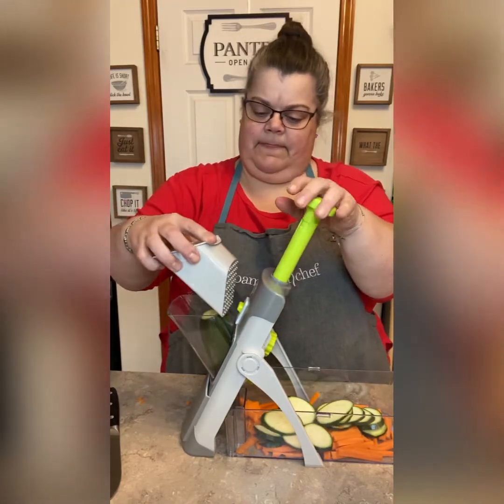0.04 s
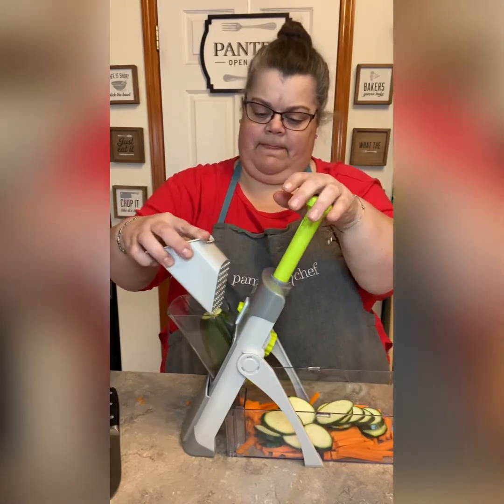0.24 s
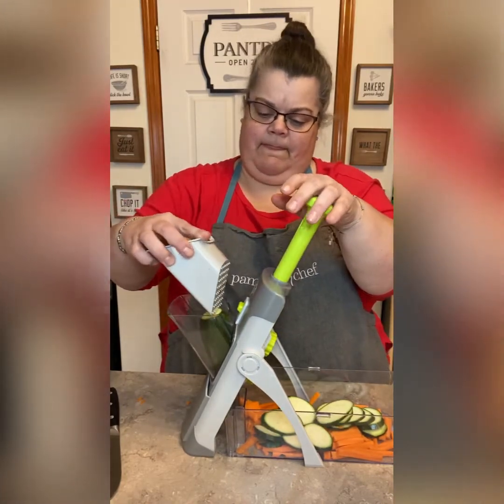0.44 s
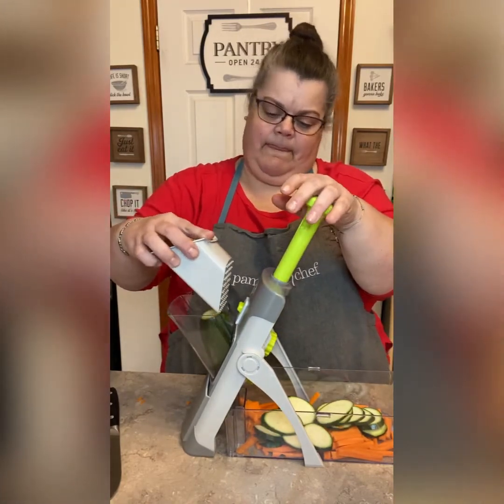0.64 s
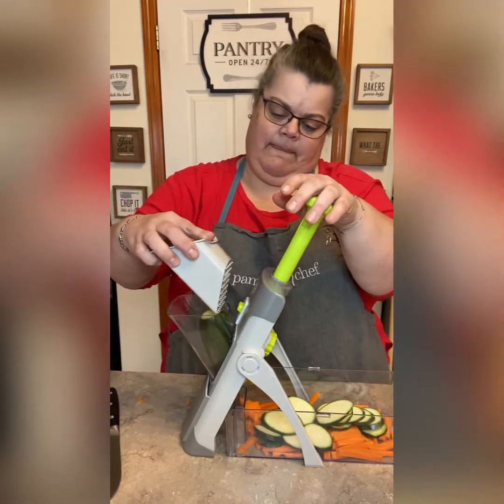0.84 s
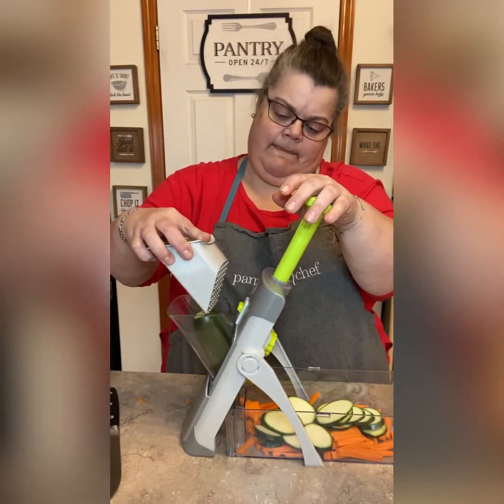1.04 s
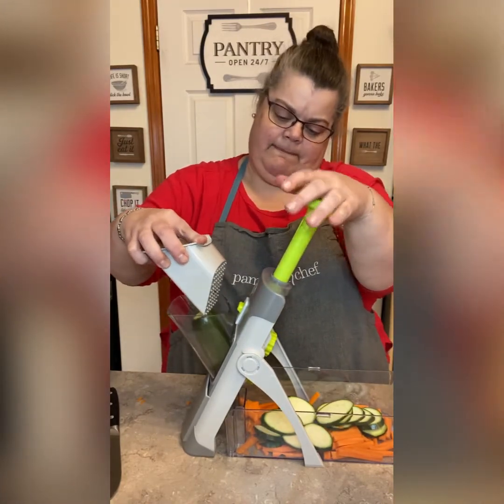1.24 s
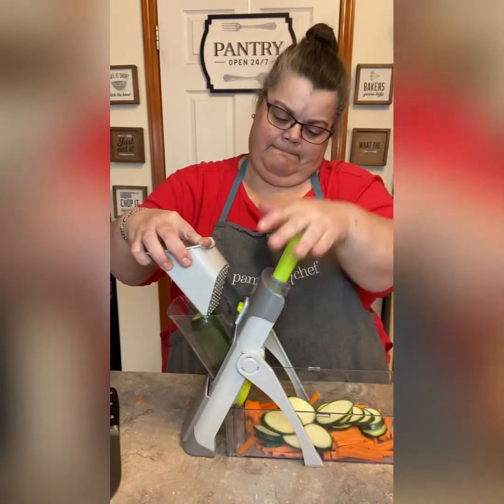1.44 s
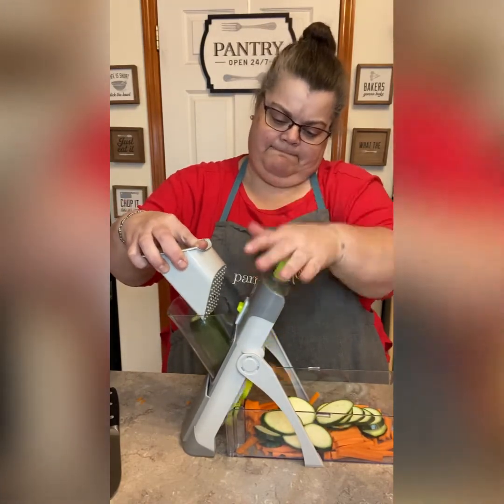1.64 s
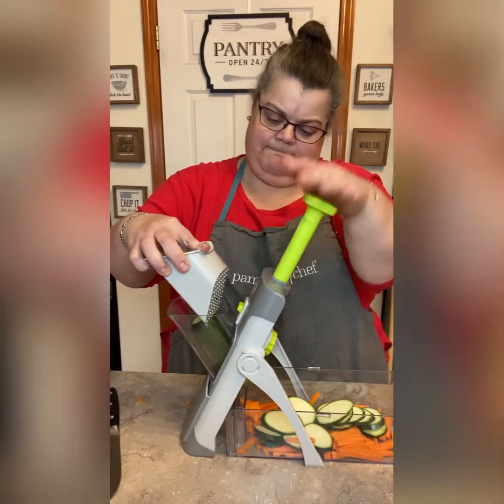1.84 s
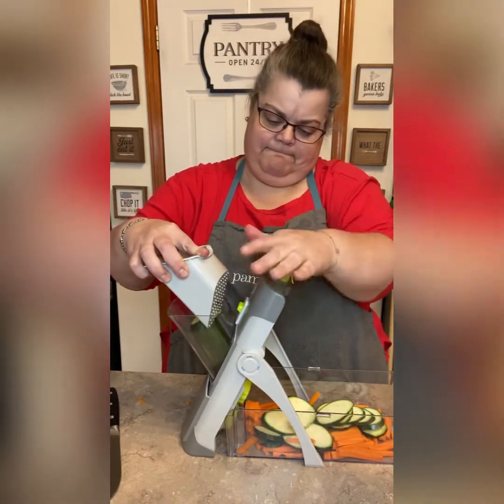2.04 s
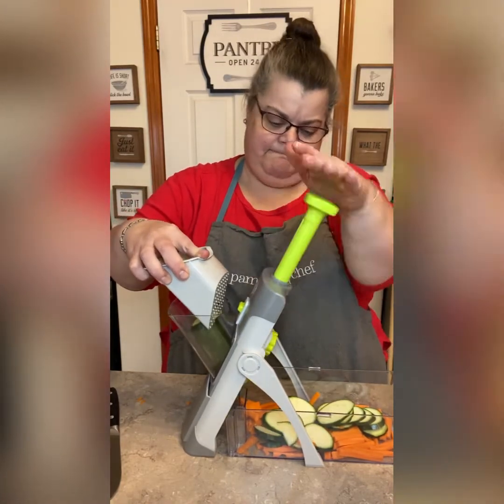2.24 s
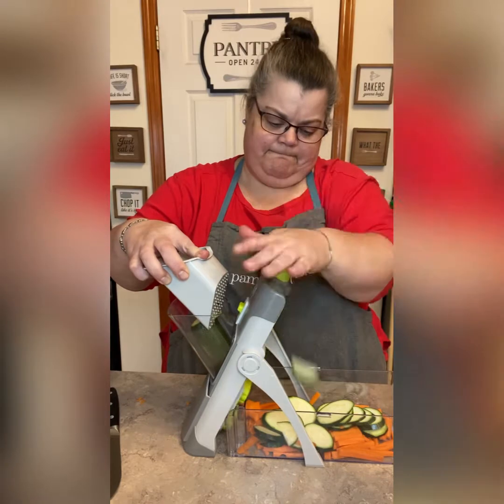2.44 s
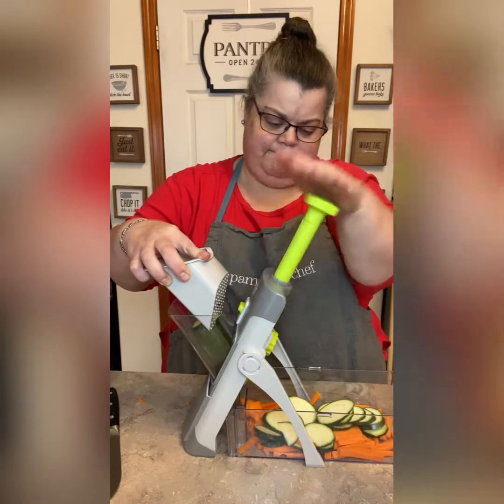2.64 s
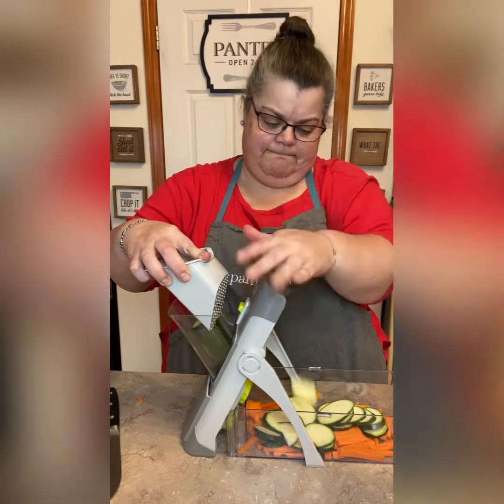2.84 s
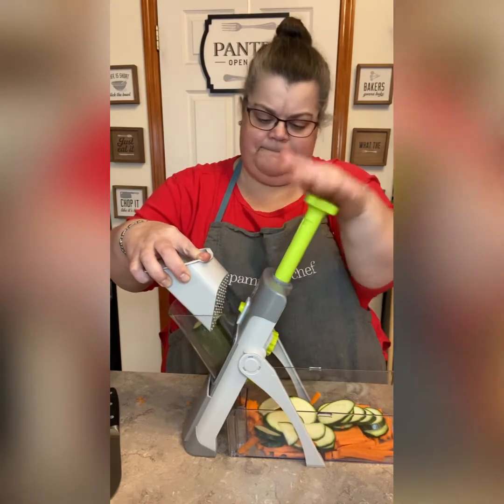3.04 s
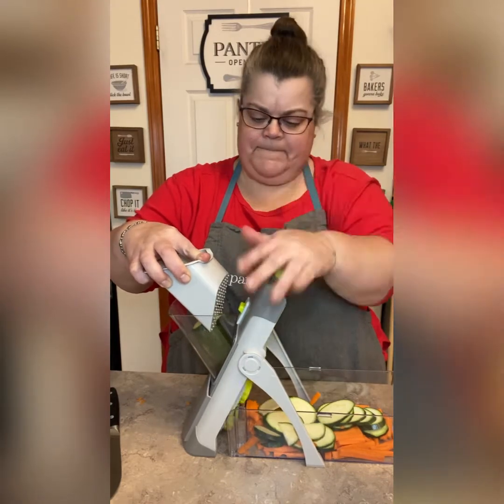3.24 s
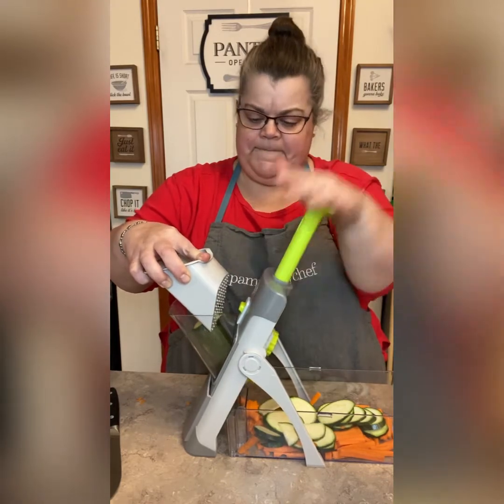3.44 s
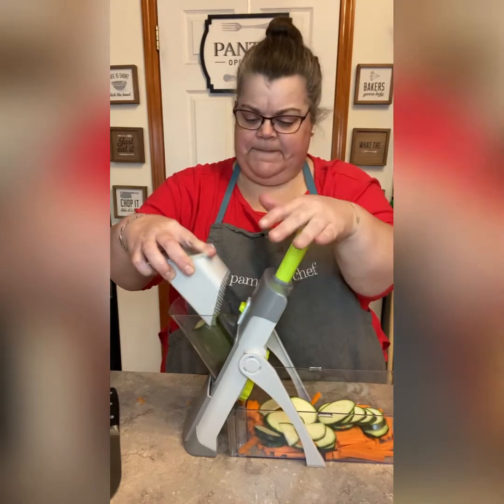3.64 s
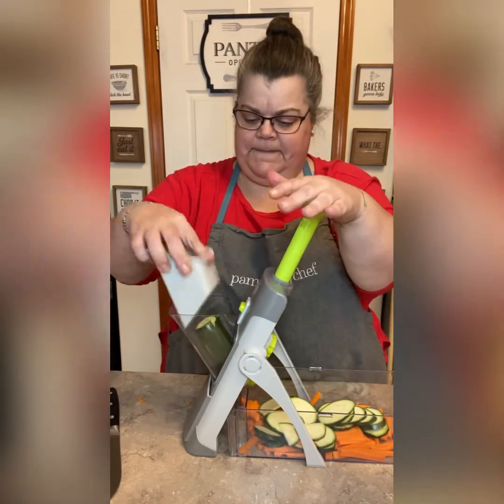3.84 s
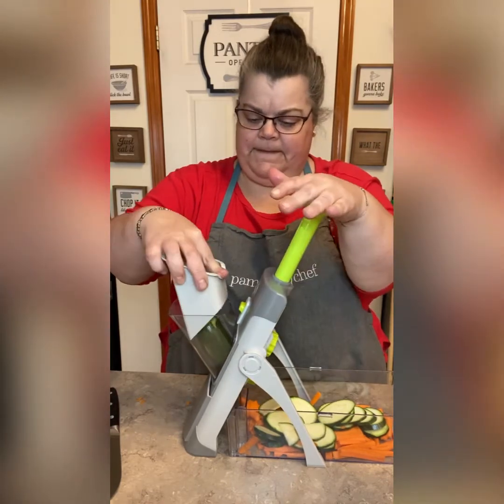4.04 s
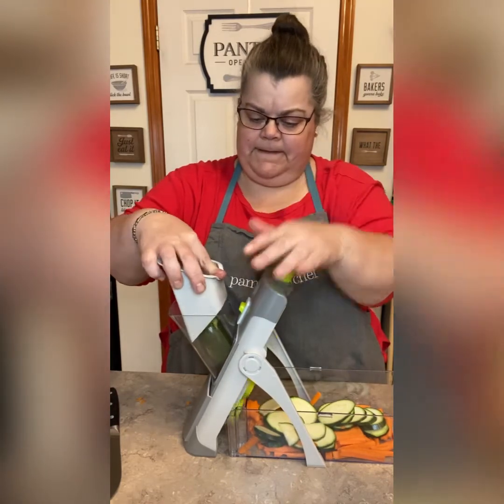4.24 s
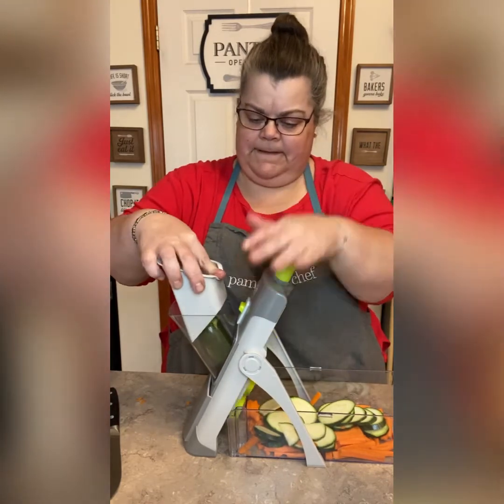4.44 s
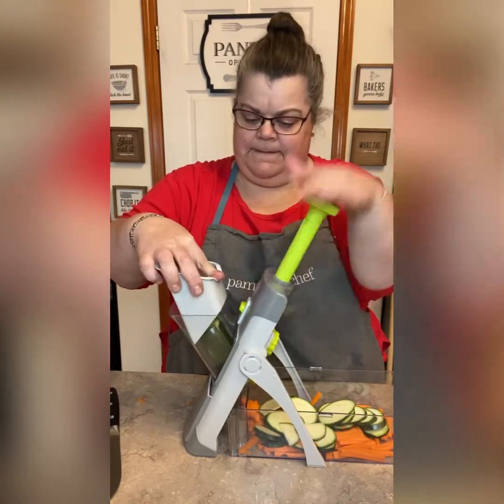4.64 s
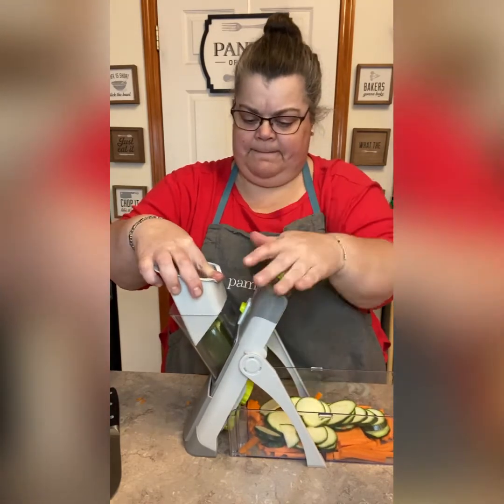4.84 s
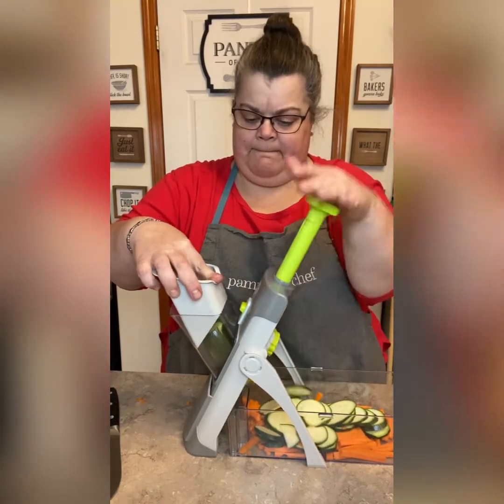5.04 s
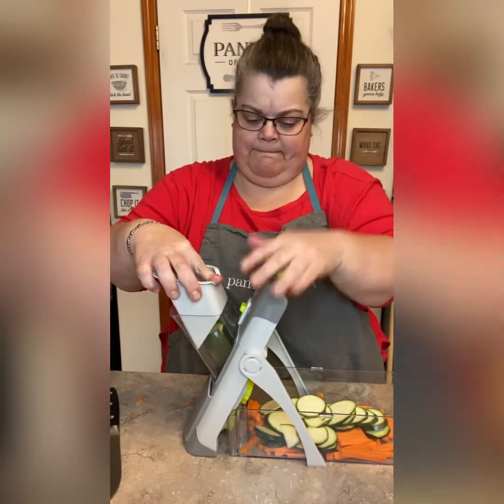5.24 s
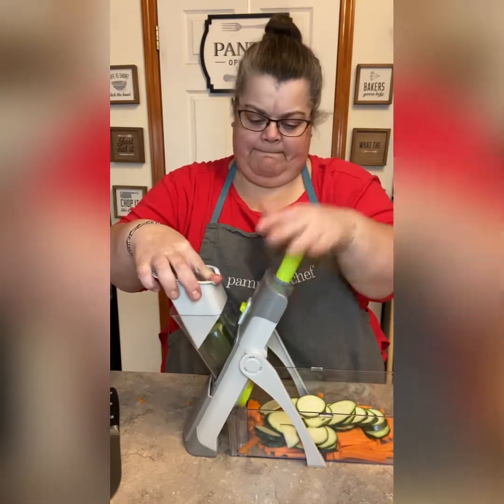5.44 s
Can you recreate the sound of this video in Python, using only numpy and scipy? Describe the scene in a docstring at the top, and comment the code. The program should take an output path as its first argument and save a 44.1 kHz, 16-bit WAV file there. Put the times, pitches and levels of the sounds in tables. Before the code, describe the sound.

A spring-loaded plastic vegetable slicer is heard up close on a stone counter in a small kitchen. For the first second or so there are only soft ticks and nudges as hands touch the plastic. From about 1.3 to 3.5 seconds the plunger is pumped five times, a little over two strokes a second. On each push the blade hisses and crunches through the vegetable and lands with a low thud through the counter; the spring then throws it back with a sharp clack that briefly rings the hollow housing, with light rubbing and rattling. A short pause holds a few taps, the clearest near 3.8 seconds. From about 4.1 seconds three more strokes follow, the strongest knock near 4.7 seconds, and the last is let back gently around 5.4 seconds. A short room echo and a faint, steady low appliance hum lie underneath throughout.

```python
"""A spring-loaded plastic slicer on a stone counter in a small kitchen, heard from close by.
First, hands nudge and tick the frame. From 1.3 s the plunger is pumped five times: the blade hisses and
crunches through the food, lands with a thud that travels through the counter, and the spring clacks it
back against its stop, ringing the hollow housing. A few taps follow, then from 4.1 s three more strokes,
the last let back gently. A short room tail and a faint hum of appliances lie under it all."""
import sys
import numpy as np
from scipy import signal
from scipy.fft import rfft, irfft, next_fast_len
from scipy.io import wavfile
from scipy.ndimage import uniform_filter1d

SR = 44100
rng = np.random.default_rng(int(sys.argv[2]) if len(sys.argv) > 2 else 0)


def materialize(psi):
    """Save the field psi as 16-bit PCM at rate SR to the path in sys.argv[1].

    A 1-D psi becomes a single channel; in a 2-D psi each row is a channel.
    """
    bounded = np.clip(np.atleast_2d(psi).T, -1, 1)
    quanta = np.round(bounded * 32767).astype(np.int16)
    wavfile.write(sys.argv[1], SR, quanta)


N = 242991

# Modes of the plastic frame: pitch_hz, level_db, t60_s
FRAME_MODES = [(250, 6, 0.024), (330, 10, 0.045), (382, 1.5, 0.054), (470, -10, 0.013), (495, 6, 0.018),
               (620, -17.5, 0.03), (700, -13, 0.044), (739.5, 1, 0.065), (784, -10.5, 0.15),
               (830, -13, 0.046), (990, 0, 0.009), (1000, -8, 0.073), (1070, 4, 0.027),
               (1206, -10.5, 0.039), (1283, 2.5, 0.0096), (1612, 18.5, 0.01), (2080, -12.5, 0.0084),
               (2110, 0, 0.065), (2300, 5.5, 0.023), (2550, 12.5, 0.012), (2905, -2.5, 0.076),
               (3130, -5, 0.018), (3440, -10, 0.0058), (3940, -22.5, 0.0021)]
# Bright colour of cracks and blade hiss: frequency_hz, level_db
CRACK_COLOUR = [(2500, -18.5), (3600, -2), (4500, 4), (5500, -3), (7000, -6), (9000, -5.5), (11000, -9),
                (13000, -3), (15500, -29), (16500, -44)]
# Darker colour of the rubbing rails: frequency_hz, level_db
RUB_COLOUR = [(200, -8.5), (350, -17.5), (520, -3.5), (750, -2.5), (1100, -2.5), (1600, -6.5), (2400, -6.5),
              (3200, -16.5), (4200, -29), (6000, -19), (9000, -39.5)]
# The plunger bottoms out: start_s, thud_db, clack_over_thud_db, hollow_hz, rattle_s
LANDINGS = [(1.493, -6, -3, 873, 0.009), (1.972, -5.5, -1.5, 805, 0.0094), (2.3779, -5.5, -7.5, 885, 0.014),
            (2.792, -5, 0.3, 815, 0.0085), (3.2008, -3, -1, 894, 0.0055), (4.255, -11, -6.5, 887, 0.014),
            (4.7462, -5.5, -7, 900, 0.01), (5.226, -7.5, -6, 800, 0.0087)]
# The spring throws it against its stop: start_s, clack_db, clack_hz, hollow_db, hollow_hz, crack_db, thud_db
RETURNS = [(1.7261, -3, 2110, -6.5, 790, -12, -24), (2.177, -2, 2320, -7.5, 787, -9.5, -20.5),
           (2.608, -1, 2480, -3.5, 838, -8, -17.5), (3.0116, -3, 2550, -6.5, 880, -10, -19),
           (3.4278, -2.5, 2530, -6, 880, -8.5, -20.5), (4.5124, -5, 2550, -5.5, 849, -12, -15.5),
           (5.0135, -10, 1970, -10.5, 830, -17, -17.5), (5.447, -21, 2360, -27.5, 915, -33, -27.5)]
# Short scrapes that chatter on: start_s, hollow_db, clack_db, loose_chatter_db
SCRAPES = [(0.126, -45, -56, 12), (.63, -36.5, -49.5, 2), (.899, -49, -74, 9), (1.664, -35, -26, -4),
           (2.1399, -37, -25, -21), (2.347, -41, -25, 0), (2.572, -48, -31.5, -12), (2.766, -33, -25.5, 12),
           (2.975, -37.5, -28, -18.5), (3.171, -41, -29.5, -2), (3.3914, -51, -38.5, -5),
           (4.922, -27, -33.5, -8)]

HAZE_S = 0.0098  # a faint haze of noise starts this long before each blow
HOLLOW_HZ, CLACK_HZ = 950, 2527  # home pitches of the housing and the struck panel
CHATTER_TOP_HZ = 13100  # loose parts and the sliding blade carry little above this
KNOCK_SAMPLES = 8192
KNOCK_BINS_HZ = np.fft.rfftfreq(KNOCK_SAMPLES, 1 / SR)


def blows():
    """Cue list of every landing, return, click, scrape and tap, with the balance of its layers."""
    # Thin bright clicks, mostly in mid-stroke: start_s, crack_db, crack_hz, rattle_s
    clicks = [(0.684, -48.5, 6960, 0.0039), (1.239, -62.5, 5030, 0.0076), (1.253, -66, 5000, 0.011),
              (1.842, -30, 5560, 0.0049), (1.905, -36, 5500, 0.0044), (2.279, -30.5, 6640, 0.0028),
              (3.319, -43, 6000, 0.0067), (4.6354, -22, 4800, 0.0033), (4.689, -46, 4540, 0.0027),
              (5.098, -34.5, 7000, 0.0042), (5.108, -53, 6500, 0.0024), (5.399, -52, 4960, .003)]
    # Hands, slices and loose parts tap the frame:
    # start_s, hollow_db, hollow_hz, clack_db, thud_db, rattle_s, loose_chatter_db
    taps = [(0.1418, -29, 950, -41, -66, 0.009, -21), (0.207, -40.5, 684, -58, -46, 0.0029, 1),
            (0.311, -37.5, 604, -76, -54, 0.0031, -33), (0.427, -46, 795, -77, -60, 0.011, -15),
            (0.528, -28, 620, -51, -42, 0.0039, -12), (0.682, -38, 666, -47, -45, 0.013, -10),
            (0.835, -38.5, 605, -58, -45, 0.0098, -7), (0.858, -35.5, 720, -48, -48, 0.005, -11),
            (0.951, -46.5, 740, -63, -65, 0.012, -3), (1.0275, -43, 1100, -78, -73, 0.0041, -32),
            (1.1085, -42, 1070, -59, -65, 0.012, -15), (1.36, -41.5, 720, -44, -43, 0.0065, -9),
            (1.379, -66, 700, -64, -47, 0.0056, -21), (1.414, -41, 750, -50, -51, .005, -18),
            (1.447, -35, 1070, -28, -49, 0.005, -2), (1.608, -27.5, 1210, -39, -27.5, 0.01, -4.5),
            (1.68, -33.5, 850, -35.5, -53, 0.0056, -7), (1.695, -56, 840, -39, -53, .006, -19),
            (1.735, -15, 763, -18, -55, 0.0057, -19), (1.88, -29.5, 710, -46, -32, 0.005, 5),
            (1.893, -20, 1250, -25.5, -25.5, 0.0053, -10), (1.938, -37, 660, -31, -36, 0.0042, -12),
            (2.0593, -29, 584, -32, -26, 0.0058, -27), (2.11, -47, 760, -41, -46, 0.0035, -9),
            (2.191, -37, 760, -25, -49, 0.0044, 0), (2.4891, -42, 670, -41, -31, 0.0064, -6),
            (2.531, -45, 750, -43, -53, 0.0034, -3), (2.902, -29, 706, -31.5, -31, 0.0047, -3),
            (3.315, -26, 736, -47, -29.5, 0.007, -16), (3.357, -48, 756, -40, -53, .004, -12),
            (3.533, -32, 736, -41, -45, 0.0031, -11.5), (3.642, -33, 1360, -48, -50, 0.0045, -16),
            (3.784, -35, 1000, -29.5, -53.5, 0.0028, -20.5), (3.8382, -21, 688, -26.5, -41, 0.0081, -11.5),
            (3.931, -40.5, 710, -50.5, -68.5, 0.0051, -4.5), (4.152, -48, 800, -47, -58, .004, -3),
            (4.172, -43, 890, -41, -49, 0.0065, 0), (4.205, -42, 716, -47, -48, 0.0098, -13),
            (4.39, -29, 714, -36.5, -30.5, 0.019, -28), (4.425, -36, 720, -40.5, -37.5, 0.0053, 15),
            (4.474, -17.5, 860, -19.5, -20.5, 0.0064, -2.5), (4.7061, -8.5, 830, -15, -12.5, 0.0064, -4.5),
            (4.889, -31.5, 790, -41, -29, 0.012, -18), (4.974, -23.5, 1440, -19, -26, 0.0088, -18),
            (4.9825, -22.5, 650, -17.5, -24.5, 0.0024, -14.5), (5.106, -31.5, 725, -26.5, -38, 0.0029, -23),
            (5.186, -21.5, 665, -25, -31, 0.0088, -8.5), (5.363, -37, 710, -59, -30.5, 0.0042, -17),
            (5.414, -38, 750, -35.5, -48, 0.0034, 1), (5.4554, -21.5, 776, -21.5, -25, 0.0065, -7.5)]
    crack_hz = 6000
    # Each row: start_s, clack_db, clack_hz, thud_db, shell_db, hollow_db, hollow_hz,
    # crack_db, crack_hz, rattle_s, loose_chatter_db
    rows = [(s, thud + hard, 1857, thud, thud + hard + 0.63, thud + hard / 2 - 1.5, hollow_hz,
             thud + hard - 9, crack_hz, rattle_s, -12) for s, thud, hard, hollow_hz, rattle_s in LANDINGS]
    rows += [(s, clack, clack_hz, thud, thud - 1, hollow, hollow_hz, crack, crack_hz, 0.0064, -17.5)
             for s, clack, clack_hz, hollow, hollow_hz, crack, thud in RETURNS]
    rows += [(s, crack - 19.5, CLACK_HZ, crack - 14.5, crack - 14.5, crack - 18, HOLLOW_HZ,
              crack, hz, rattle_s, -29) for s, crack, hz, rattle_s in clicks]
    rows += [(s, clack, CLACK_HZ, hollow - 9.5, hollow - 9.5, hollow, 800,
              clack - 14, crack_hz, 0.008, loose) for s, hollow, clack, loose in SCRAPES]
    rows += [(s, clack, CLACK_HZ, thud, thud - 1.5, hollow, hz, clack - 10.5, crack_hz, rattle_s, loose)
             for s, hollow, hz, clack, thud, rattle_s, loose in taps]
    return rows


def knocks():
    """Each blow rings the frame in three layers (low shell, hollow, clack) with a bright crack on top."""
    scrape_times = [row[0] for row in SCRAPES]
    stop_times = [row[0] for row in LANDINGS + RETURNS]
    dull = 1 / np.sqrt(1 + (KNOCK_BINS_HZ / CHATTER_TOP_HZ) ** 16)
    out = np.zeros(N + 2 * KNOCK_SAMPLES)
    for (s, clack_db, clack_hz, _, shell_db, hollow_db, hollow_hz,
         crack_db, crack_hz, rattle_s, loose_db) in blows():
        modes = struck_modes(hollow_hz, clack_hz)
        # scrapes and gentle touches have no hard attack
        hardness = (s not in scrape_times) * np.clip((hollow_db + 35) / 6, 0, 1)
        haze_db = -28 if s in stop_times else -43  # stronger before the plunger's stops
        haze, attack, rattle, loose = contacts(haze_db, hardness, rattle_s, loose_db)
        rings = frame_ring(modes, haze, attack + rattle, loose)
        crack_eq_db = along(CRACK_COLOUR, KNOCK_BINS_HZ) - 3.5 * octaves(KNOCK_BINS_HZ + 1, crack_hz)
        crack = (rattle + .3 * attack + dull * (loose + .3 * haze)) * undb(crack_eq_db)
        layers = irfft([*rings, crack], KNOCK_SAMPLES)[:, :-1024]
        levels_db = (shell_db + 2, hollow_db + 1.5, clack_db + 0.5, crack_db + 7.5)
        i = int((s - HAZE_S - .0011) * SR)
        out[i:i + layers.shape[1]] += sum(peak(layer, db) for layer, db in zip(layers, levels_db))
    return out[:N]


def contacts(haze_db, hardness, rattle_s, loose_db):
    """Spectra of one blow: a faint haze of noise just before it, a hard push, a rattle, loose chatter."""
    t = np.arange(5120) / SR
    after = np.maximum(t - HAZE_S, 0)
    haze = undb(haze_db) * (1 - np.exp(-t / 0.00092)) * (t < HAZE_S + .002)
    attack = hardness * undb(11) * np.exp(-((t - HAZE_S - .0008) / 0.00013) ** 2)
    rise = 1 - np.exp(-(after / max(0.26 * rattle_s, .0002)) ** 2)
    rattle = rise * np.exp(-(after / max(rattle_s, .0005)) ** 2.56)
    loose = undb(loose_db) * (1 - np.exp(-after / 0.0013)) * np.exp(-after / 0.031)
    grit = rng.standard_normal(len(t)) * undb(3.8 * rng.standard_normal(len(t)))
    return rfft([grit * haze, attack, grit * rattle, grit * loose], KNOCK_SAMPLES)


def struck_modes(hollow_hz, clack_hz):
    """Every blow lands elsewhere: modes near its hollow and clack pitches ring most, the rest by chance."""
    cavity, panel = (HOLLOW_HZ, -4.5, 0.053), (CLACK_HZ, -2.5, 0.023)  # pitch_hz, level_db, t60_s
    hz, db, t60 = np.transpose(FRAME_MODES + [cavity, panel])[:, :, None]
    region = np.searchsorted([500, 1500], hz)  # 0 shell, 1 hollow, 2 clack
    spot_db = -27 * octaves(hz, hollow_hz) * (region == 1) - 14 * octaves(hz, clack_hz) * (region == 2)
    spot_db += 1.6 * rng.standard_normal(hz.shape)
    pitch = hz * (1 + 0.016 * rng.standard_normal(hz.shape))
    pitch[-2:, 0], spot_db[-2:] = (hollow_hz, clack_hz), 0  # cavity and panel take the blow's own pitches
    return pitch, db + spot_db, t60, region


def frame_ring(modes, haze, hit, loose):
    """Spectra of the frame's three regions, each in its own band; slow bending waves bring the lows late."""
    # Shell, hollow and clack regions: low_hz, high_hz, delay_s, haze_gain
    regions = [(215, 770, 0.00341, .1), (462, 2200, 0.00202, 0.66), (1210, 7200, 0.00019, 2.3)]
    pitch, db, t60, region = modes
    t = np.arange(1536) / SR
    swing = undb(db) * np.sin(2 * np.pi * pitch * t)
    drive = np.interp(pitch, KNOCK_BINS_HZ, np.abs(hit))
    evening = (np.mean(drive) / (drive + 0.52 * np.mean(drive))) ** 0.91  # the rattle misses no mode
    free = swing * evening * 1000. ** (-t / t60)
    damped = swing * 1000. ** (-t / (0.2 * t60))  # chatter damps the modes
    rings = []
    for k, (low_hz, high_hz, delay_s, haze_gain) in enumerate(regions):
        inside = region[:, 0] == k
        struck = (hit + haze_gain * haze) * rfft(free[inside].sum(axis=0), KNOCK_SAMPLES)
        chatter = 2.55 * loose * rfft(damped[inside].sum(axis=0), KNOCK_SAMPLES)
        _, band = signal.freqz(*signal.butter(3, [low_hz, high_hz], "band", fs=SR), KNOCK_BINS_HZ, fs=SR)
        rings.append((struck + chatter) * band * np.exp(-2j * np.pi * KNOCK_BINS_HZ * delay_s))
    return rings


def counter_thuds():
    """Each blow sends a bending wave through the counter: highs arrive first, a few slow swings follow."""
    counter_hz, legs_s, rock_s = 105.5, 0.0028, .005
    t = np.arange(5120) / SR
    cycles = counter_hz * t + 0.66 * (1 - np.exp(-(t / 0.0057) ** 2.36))
    rise = 1 - np.exp(-(t / 0.0042) ** 2)
    fall = np.exp(-(t / 0.029) ** 3) + 0.2 * np.exp(-t / 0.017)
    thud = rise * fall * np.sin(2 * np.pi * cycles)
    out = np.zeros(N + len(t))
    for s, _, _, thud_db, *_ in blows():
        # a weak thud is not aimed down the legs: it rocks the stand first and arrives later
        delay_s = legs_s + rock_s * np.clip((-11 - thud_db) / 6, 0, 1)
        i = int((s - .0011 + delay_s) * SR)
        out[i:i + len(t)] += undb(thud_db) * thud
    return out[:N]


def housing_tones():
    """Some blows leave a clear tone in the housing; its pitch wanders and loose parts make it waver."""
    # Lingering modes: start_s, pitch_hz, level_db, swell_s, t60_s
    tones = [(.144, 2580, -48, .003, .12), (.145, 930, -36, .003, .07), (.53, 640, -36, .002, .04),
             (.632, 740, -41, 0.013, 0.28), (.855, 750, -40.5, .006, .1), (1.7355, 770, -9.5, .003, .05),
             (1.735, 2130, -23, .003, .06), (1.894, 1180, -26, .002, .04), (2.18, 2450, -22, .004, .1),
             (2.611, 2560, -19, .004, .1), (2.903, 740, -35, .002, .06), (3.013, 770, -11, .004, .07),
             (3.013, 2560, -14.5, .003, .1), (3.43, 2550, -21, .003, .1), (3.43, 770, -15, .003, .07),
             (3.839, 1280, -26, 0.0014, .035), (3.84, 686, -16.5, 0.0041, 0.022),
             (3.853, 742, -34, .006, 0.29), (4.515, 2520, -21, .003, .1), (4.712, 830, -12.5, 0.007, 0.14),
             (5.188, 720, -32.5, .004, .08)]
    t = np.arange(8192) / SR
    out = np.zeros(N + len(t))
    wandering_time = np.cumsum(np.append(1 + .035 * walk(140), np.ones(len(t)))) / SR
    for s, hz, db, swell_s, t60 in tones:
        i = int(s * SR)
        envelope = (1 - np.exp(-(t / swell_s) ** 2)) * 1000. ** (-t / t60)
        cycles = hz * (wandering_time[i:i + len(t)] - wandering_time[i]) + rng.random()
        out[i:i + len(t)] += peak(envelope, db) * np.sin(2 * np.pi * cycles)
    return out[:N] * undb(3.5 * np.clip(walk(110), -2, 2))


def strokes():
    """Rub and hiss envelopes: the blade hisses on the push, far less while the spring lifts it."""
    # Four nudges, then two bouts of pumping: start_s, end_s, rub_db, hiss_db
    bouts = [(-.2, 0.002, -55, -82), (0.104, .26, -93, -102), (0.52, 0.68, -61, -82),
             (0.807, 0.952, -72, -97), (1.299, 3.531, -42.5, -52), (4.091, 5.6, -45.5, -54)]
    speed_up_s, settle_s = 0.19, 0.084
    t = np.arange(N) / SR
    # corners of the hiss contour: time_s, level_db
    push = [(s, 1) for s, *_ in bouts] + [(s, 1) for s, *_ in RETURNS] + [(s, 0) for s, *_ in LANDINGS]
    lift = [(s + .01, -22) for s, *_ in LANDINGS] + [(s - .01, -1.5) for s, *_ in RETURNS]
    blade = undb(np.interp(t, *np.transpose(sorted(push + lift))))
    rub, hiss = np.zeros((2, N))
    for start_s, end_s, rub_db, hiss_db in bouts:
        swell = np.clip((t - start_s) / speed_up_s, 0, 1) ** 1.22
        moving = swell * np.exp(-np.maximum(t - end_s, 0) / settle_s)
        rub += undb(rub_db) * moving
        hiss += undb(hiss_db) * moving * blade
    return rub, hiss


def rail_rub(rub_gain):
    """Stick-slip grit in the rails rubs and rings the frame's modes, chattering up after each blow."""
    grit = rng.standard_normal(N) * undb(3.13 * rng.exponential(size=N) + 5.64 * np.clip(walk(45), -2, 1.6))
    t = np.arange(4096) / SR
    hz, db, t60 = np.transpose(FRAME_MODES)[:, :, None]
    mode_gain = undb(along(RUB_COLOUR, hz) + 0.32 * db) / np.sqrt(t60)
    modes = mode_gain * np.sin(2 * np.pi * hz * t) * 1000. ** (-t / (1.7 * t60))
    ring = signal.fftconvolve(grit, modes.sum(axis=0))[:N]
    start_s, _, _, _, _, hollow_db, *_ = np.transpose(blows())
    chatter = dying(start_s, hollow_db - 14, decay_s=0.018)
    return (rub_gain + chatter) * (undb(-4) * unit(colour(grit, RUB_COLOUR)) + undb(-2.5) * unit(ring))


def blade_hiss():
    """Bright, fluttering hiss of the blade sliding through the food."""
    hiss = rng.standard_normal(N) * undb(1.5 * walk(50))
    dulled = signal.sosfilt(signal.butter(6, CHATTER_TOP_HZ, fs=SR, output="sos"), hiss)
    return unit(colour(dulled, CRACK_COLOUR))


def crunch():
    """Fibres snap under the blade: sparse bursts of uneven size, each a few milliseconds long."""
    snaps_per_s, decay_s = 17, 0.0067
    snaps = (rng.random(N) < snaps_per_s / SR) * undb(1.9 * rng.exponential(size=N))
    bursts = signal.lfilter([1], [1, -np.exp(-1 / (decay_s * SR))], snaps) * rng.standard_normal(N)
    crisp = [(700, -21.5), (1500, 6), (3000, -0.5), (5000, -8), (9000, -8.5), (13000, -29.5)]
    return unit(colour(bursts, crisp))


def plunger_rasp(hiss_gain):
    """Grit through one narrow resonance, riding on the hiss and flaring with each scrape."""
    pitch_hz, width_hz = 3140, 170
    start_s, _, clack_db, _ = np.transpose(SCRAPES)
    grit = rng.standard_normal(N) * undb(5.8 * np.clip(walk(130), -2, 2))
    ring = signal.lfilter(*signal.iirpeak(pitch_hz, pitch_hz / width_hz, fs=SR), grit)
    return unit(ring) * (hiss_gain + dying(start_s, clack_db - 10, decay_s=0.0038))


def counter_shudder():
    """Low rumble of the counter: barely there at rest, shaken up by each blow."""
    bass = [(30, -44.5), (50, -11.5), (80, 12.5), (110, 5.5), (170, 4), (260, -11.5), (500, -47.5)]
    rumble = unit(colour(rng.standard_normal(N), bass))
    start_s, _, _, thud_db, *_ = np.transpose(blows())
    return rumble * (undb(-59) + dying(start_s, thud_db - 16.5, decay_s=0.059))


def room(x):
    """Diffuse tail of the kitchen, each octave dying at its own rate."""
    # Decay of the room: frequency_hz, t60_s
    decay = [(100, 0.53), (500, 0.31), (1500, 0.28), (4000, 0.34), (9000, 0.29), (15000, 0.26)]
    # Colour of the reverb: frequency_hz, level_db
    wet_colour = [(100, -9.5), (400, -24.5), (1000, -17.5), (1900, -9), (2600, -11), (3600, -14),
                  (6000, -21), (11000, -24), (13500, -40.5)]
    t = np.arange(24576) / SR
    noise, tail = diffuse(len(t)), 0
    for hz in 62.5 * 2. ** np.arange(9):
        band = colour(noise, [(hz / 2, -60), (hz / 1.5, -6), (hz, 0), (hz * 1.5, -6), (hz * 2, -60)])
        tail = tail + band * 1000. ** (-t / along(decay, hz))
    tail = colour(tail * (1 - np.exp(-t / 0.0035)), wet_colour) * undb(-19.5)
    return signal.fftconvolve(x[None], tail, axes=1)[:, :N]


def appliance_hum():
    """A faint, steady bed of low diffuse noise from the appliances."""
    # Colour of the hum: frequency_hz, level_db
    hum_colour = [(25, -13.5), (62, 11.5), (90, -15), (120, 3), (170, 4), (300, -9.5), (400, -4.5),
                  (520, -15.5), (760, -7.5), (1100, -20.5), (1600, -30), (3000, -33.5), (6000, -46.5),
                  (14000, -71)]
    return undb(-55.5) * unit(colour(diffuse(next_fast_len(N))[:, :N], hum_colour))


def stereo_placement(x):
    """Placement by pitch: mids lean left, the highest treble is spread wide, nearly out of phase."""
    # Phase of left ahead of right: frequency_hz, phase_rad
    phase_lead = [(0, 0), (150, -.04), (400, -.25), (860, -.55), (1640, -.2), (2700, -1), (4200, -.3),
                  (6800, -.4), (10200, -1.5), (12000, -2.7), (14000, -3.1)]
    # Level of left over right: frequency_hz, level_db
    balance = [(60, 0), (110, .4), (200, 1), (380, 2.5), (700, 4.5), (1290, 2), (2380, 1), (4400, 0),
               (15000, 0)]
    size = next_fast_len(N)
    hz = np.fft.rfftfreq(size, 1 / SR)
    left = np.sqrt(undb(along(balance, hz))) * np.exp(.5j * along(phase_lead, hz))
    return irfft(rfft(x, size) * np.array([left, 1 / left]), size)[:, :N]


def diffuse(size):
    """Stereo noise, as wide in each band as sound arriving from all around."""
    # Likeness of left and right: frequency_hz, correlation
    likeness = [(60, 1.0), (130, 1), (290, 0.92), (640, -0.36), (1410, 0.23), (3100, -0.36), (6820, 0.2),
                (15000, 0.94)]
    correlation = np.clip(along(likeness, np.fft.rfftfreq(size, 1 / SR)), -.98, 1)
    mid, side = rfft(rng.standard_normal((2, size))) * np.sqrt([1 + correlation, 1 - correlation])
    return irfft([mid + side, mid - side], size) / 2


def undb(db):
    """Decibels to gain."""
    return 10 ** (np.asarray(db) / 20)


def octaves(hz, centre_hz):
    """Distance from a centre pitch, up or down."""
    return np.abs(np.log2(hz / centre_hz))


def along(table, hz):
    """Reads a (frequency_hz, value) table on a log-frequency axis."""
    frequencies, values = np.transpose(table)
    return np.interp(np.log(hz + 1), np.log(frequencies + 1), values)


def colour(x, table):
    """Equalises x with a (frequency_hz, level_db) curve."""
    size = next_fast_len(x.shape[-1])
    gain = undb(along(table, np.fft.rfftfreq(size, 1 / SR)))
    return irfft(rfft(x, size) * gain, size)[..., :x.shape[-1]]


def unit(x):
    """Scales x to an RMS of 1."""
    return x / np.sqrt(np.mean(x ** 2))


def peak(x, db):
    """Scales x to peak at db."""
    return x * undb(db) / np.max(np.abs(x))


def walk(rate_hz):
    """Glides between random values, rate_hz of them a second; spread near 1."""
    hold = int(SR / rate_hz)
    return uniform_filter1d(np.repeat(rng.standard_normal(N // hold + 1), hold), hold)[:N]


def dying(times, levels_db, decay_s):
    """Sum of envelopes that start at the given times and die away."""
    kicks = np.zeros(N)
    np.add.at(kicks, (np.array(times) * SR).astype(int), undb(levels_db))
    return signal.lfilter([1], [1, -np.exp(-1 / (decay_s * SR))], kicks)


def scene():
    """The slicer sounds direct and in the room; the counter's bass stays dry; the hum lies beneath."""
    frame = knocks()
    rub_gain, hiss_gain = strokes()
    rub, hiss = rail_rub(rub_gain), blade_hiss()
    counter = counter_thuds() + counter_shudder()
    hiss_gain *= undb(1.5 * np.clip(walk(18), -2, 1.5))  # the slide catches and frees itself
    cutting = hiss_gain * (hiss + undb(2.5) * crunch())
    slicer = frame + rub + cutting + plunger_rasp(hiss_gain) + housing_tones()
    return stereo_placement(slicer + counter) + room(slicer) + appliance_hum()


def record(dry):
    """The microphone loses the deepest bass; the phone rounds the loudest peaks and cuts the top."""
    low_cut_hz, top_hz = 45, 16600
    thinned = signal.sosfilt(signal.butter(3, low_cut_hz, "high", fs=SR, output="sos"), dry)
    rounded = np.tanh(1.037 * thinned) / 1.071
    return signal.sosfilt(signal.ellip(10, .2, 80, top_hz, fs=SR, output="sos"), rounded)


dry = scene()
out = record(dry)
materialize(out)
```